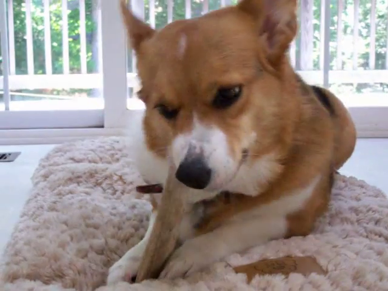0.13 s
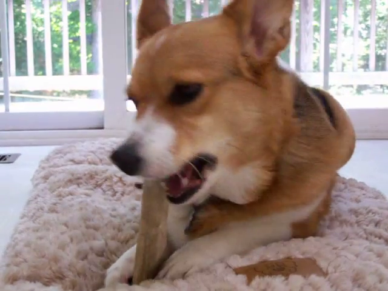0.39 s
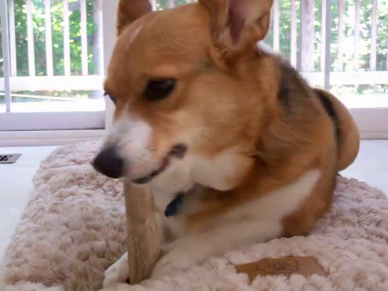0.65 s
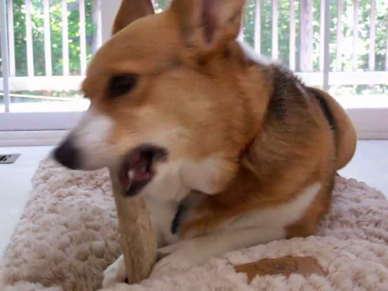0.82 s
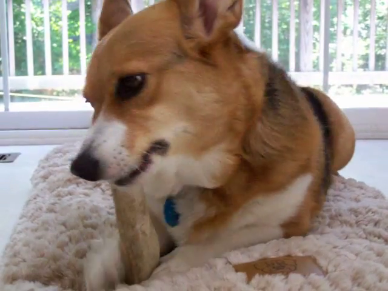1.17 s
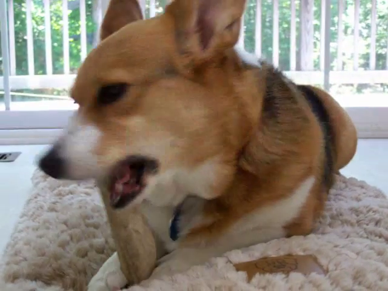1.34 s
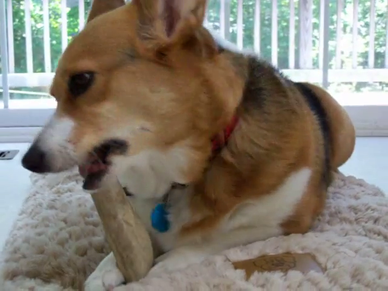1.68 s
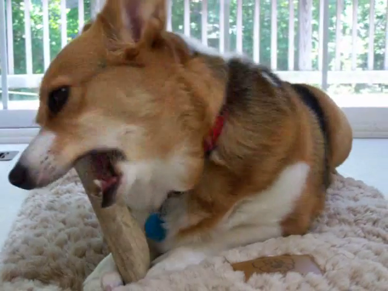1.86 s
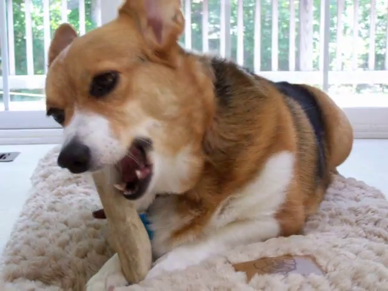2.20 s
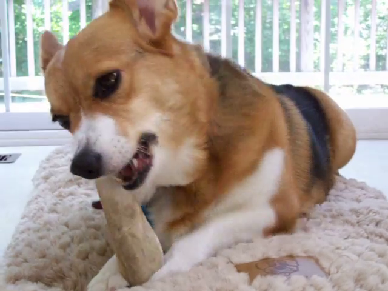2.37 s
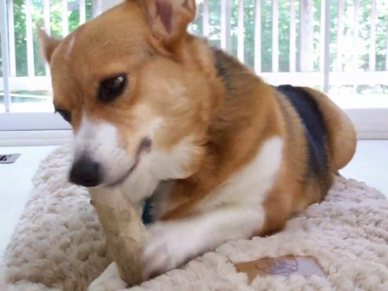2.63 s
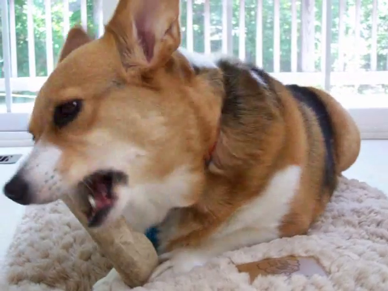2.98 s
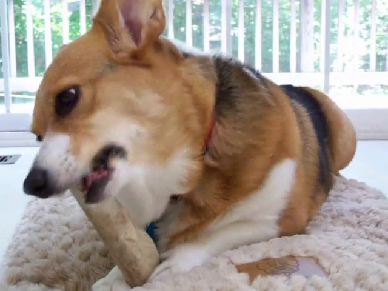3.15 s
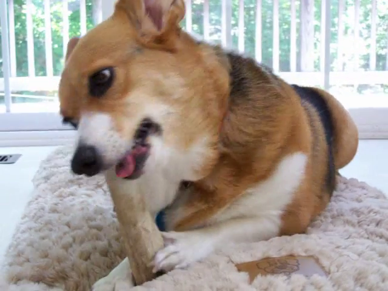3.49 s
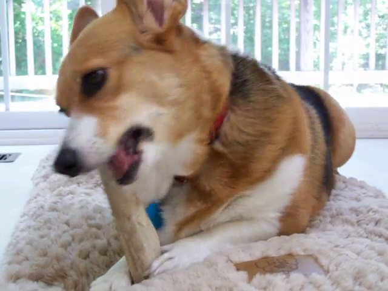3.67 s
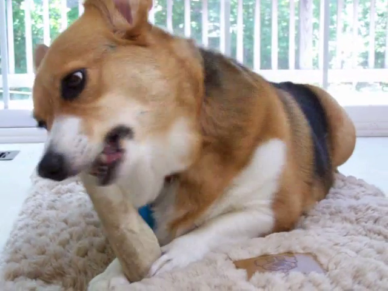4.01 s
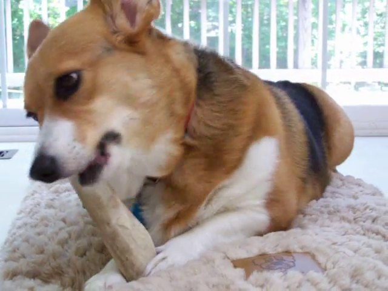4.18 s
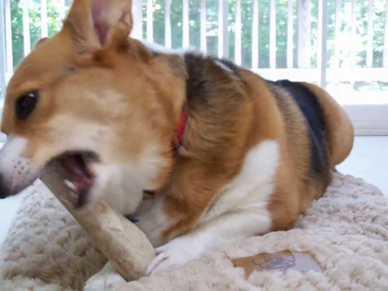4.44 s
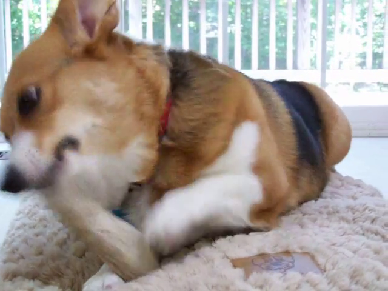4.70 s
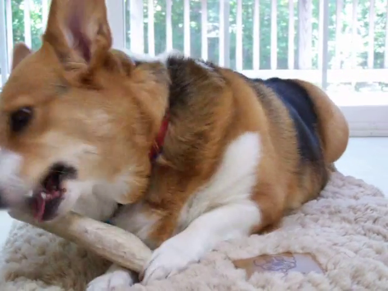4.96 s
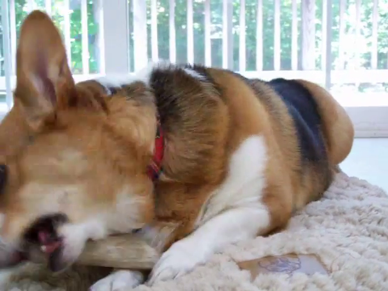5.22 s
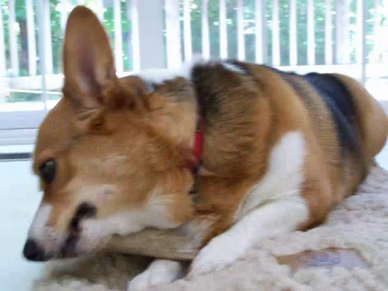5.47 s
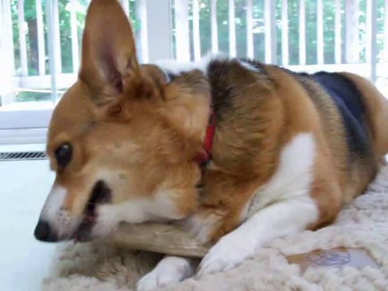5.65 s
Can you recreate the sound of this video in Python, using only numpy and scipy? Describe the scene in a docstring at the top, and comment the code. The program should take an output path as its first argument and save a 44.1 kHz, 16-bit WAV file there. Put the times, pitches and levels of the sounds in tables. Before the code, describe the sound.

A dog gnaws an antler close to the microphone in a small room. Its back teeth grind in short, uneven bites, each a dull thud with a gritty crunch. Between bites, teeth knock on the antler, sometimes with a brief ring, and the wet mouth ticks and smacks. The grinding stops near the end, leaving a knock and small mouth sounds. A low hum, ventilation noise and thin whine continue throughout.

```python
"""A dog gnaws an antler on a cushion in a small room, its mouth close to the microphone.
Its back teeth grind over the antler in short slips that thud in the jaw and break off fine grit.
Between bites teeth knock on the antler and set it ringing; the wet mouth ticks, squelches and smacks.
Behind the dog lies the room tone: a low hum, ventilation noise, hiss and a thin steady whine."""
import sys
import numpy as np
from scipy import signal
from scipy.fft import rfft, irfft
from scipy.io import wavfile

SR = 44100
rng = np.random.default_rng(int(sys.argv[2]) if len(sys.argv) > 2 else 0)


def transcribe(u):
    """Save the signal u as a 16-bit wav file named by the first command-line argument.

    u: samples, shape (n,) or (channels, n), limited to [-1, 1]; the rate is SR.
    q: integer samples, one column per channel.
    """
    v = np.clip(np.atleast_2d(u).T, -1, 1)
    q = np.round(v * 32767).astype(np.int16)
    wavfile.write(sys.argv[1], SR, q)


N = 257544

# spectra of the ventilation and hiss behind the dog: (frequency [Hz], relative level [dB])
VENTILATION_SPECTRUM = [(15, -54.5), (25, -28), (46, -11), (90, -9), (152, -3), (245, -5.5), (282, -6),
                        (359, -0.5), (389, -10.5), (515, -12), (629, -14), (1170, -19.5), (1350, -22),
                        (3000, -26.5), (3900, -48), (6600, -120)]
HISS_SPECTRUM = [(2400, -23.5), (3000, -9.5), (3450, -4.5), (3950, -5), (4300, 4.5), (4600, -12),
                 (5200, -10), (6400, -11), (7300, -21.5), (8600, -40.5)]
# lines of hum and whine: (frequency [Hz], rms level [dB], width [Hz])
HUM_LINES = [(58.9, -53, .5), (89, -62.5, 10), (123.6, -50.5, 6.4), (156.9, -49.5, 4.8), (242.7, -54, 11),
             (361.4, -56, 8.1), (3160, -62, 3.1), (3460, -65.5, 17), (4180, -55.5, 22), (4235, -52, 0.88),
             (4216, -59.5, 22), (4363, -52.5, 50)]
# bites, each an even run of slips that swell and ease off: (first slip [s], hardest moment [s],
# last slip [s], slips [count], swell [dB], thud level [dB], grit level [dB], jaw pitch [ratio])
BITES = [(.034, .153, .156, 4, 3.5, -27, -36, 1), (.47, .47, .47, 1, -2, -28, -53, 1.03),
         (.561, .578, .618, 4, 1.5, -29.5, -38, 0.98), (1.046, 1.071, 1.099, 3, 0, -21, -33.5, 1.01),
         (1.152, 1.153, 1.214, 2, 2, -29, -41, 1.06), (1.487, 1.514, 1.565, 4, 10, -21.5, -33, 1.03),
         (2.357, 2.43, 2.452, 3, 10.5, -22, -33, 1.03), (2.49, 2.513, 2.513, 2, 15, -17, -32.5, 1.06),
         (2.562, 2.60, 2.642, 3, 12, -21.5, -39, 0.974), (3.984, 4.004, 4.004, 2, 6.5, -18, -30, 1.1),
         (4.048, 4.05, 4.18, 4, 13.5, -21, -34.5, .92), (4.543, 4.545, 4.577, 2, 5, -24.5, -32, 1.02),
         (4.614, 4.615, 4.705, 3, 5.5, -26, -34, 0.83)]
# spectra of the jaw's thud and of crumbling antler: (frequency [Hz], relative level [dB])
JAW_SPECTRUM = [(40, -66), (90, -10.5), (130, -7), (200, 1), (270, -3), (350, 0), (420, -11.5),
                (520, -24.5), (700, -28.5), (1300, -29.5), (3000, -77.5)]
GRIT_SPECTRUM = [(60, -35), (300, -30.5), (700, 1), (1200, -11.5), (2000, 1.5), (3000, 7.5), (4400, 8),
                 (5400, -5.5), (7200, -6), (8600, -27.5)]
# squelches of lips and tongue: (middle time [s], length [s], level [dB])
SQUELCHES = [(.089, 0.038, -44), (.648, .043, -30), (2.455, 0.024, -36), (2.674, .089, -42.5),
             (3.238, 0.048, -45.5), (3.325, .024, -34.5), (3.592, 0.044, -37.5), (5.311, 0.027, -42.5)]
# a tooth knocks on the antler:
# (time [s], level [dB], contact pitch [Hz], muffling by the lips [0-1], crack relative to level [dB])
KNOCKS = [(0.115, -22.5, 2520, 0.6, 5.5), (.4744, -18, 2400, .85, -16), (.5523, -18.5, 2500, 0.73, -4),
          (0.7718, -29.5, 1900, 1, -14), (1.837, -19, 1850, 0.05, -12), (2.1538, -19, 1840, 0.34, 2),
          (2.3742, -27, 2200, 0.7, -3), (2.3975, -21.5, 2260, 0.6, 7), (2.4445, -25, 2560, .55, 3),
          (2.513, -14, 1430, 1, -11), (2.7527, -27.5, 1800, 0.9, 3), (2.947, -11.5, 3000, 0.8, -9),
          (2.9483, -9.5, 1630, 0.04, -9), (3.1297, -21, 2450, 0.8, -17), (3.7867, -14.5, 1820, 0.16, 3),
          (4.1984, -22.5, 2140, 1, -12), (4.5097, -19.5, 2210, 0.97, 0.5), (4.527, -20.5, 1880, 0.7, -1),
          (4.6085, -32, 2320, 0.7, 13), (5.1235, -16, 3780, 0.91, 6.5)]
# modes of the antler, whose uneven cross-section splits the main bending mode into a beating pair:
# (frequency [Hz], level [dB], t60 [s])
ANTLER_MODES = [(720, -27, .09), (1020, -27, .07), (1400, -28, .05), (1637, -22, .22), (1780, -18, .3),
                (1824, -21, .2), (2750, -20, .02), (3080, -22, .04), (4330, -21, .07)]
# spectra of a tooth's crack, the mouth's hollow and a saliva snap: (frequency [Hz], relative level [dB])
CRACK_SPECTRUM = [(80, -37), (500, -18), (1200, -12.5), (3000, -7), (4400, 6.5), (5600, -12), (7000, -3),
                  (8600, -33.5)]
HOLLOW_SPECTRUM = [(80, -31.5), (300, -14), (600, -2.5), (900, -7), (1400, -11), (2500, -13.5), (6000, -40)]
SNAP_SPECTRUM = [(300, -33), (1300, -14), (2100, -7.5), (3300, -2), (4100, 4), (4900, -2.5), (5700, -24.5),
                 (7000, -25.5), (8600, -32.5)]
# films of saliva pop: (time [s], level [dB], pitch [Hz], decay [cycles])
SMACKS = [(.571, -22, 3640, 1.8), (0.5965, -29.5, 6560, 3.6), (0.9542, -14, 4110, 2.2),
          (1.5155, -17.5, 4170, 1.3), (1.985, -32, 5500, 2.2), (2.208, -30, 2820, 0.83),
          (2.251, -31.5, 3100, 2.3), (2.564, -30.5, 6340, 1.5), (2.589, -29, 4230, 3.1),
          (2.8132, -31, 3380, 1.4), (3.327, -23.5, 3860, 3.6), (3.4188, -16.5, 4060, 2.7),
          (3.6595, -24.5, 4600, 3.4), (4.045, -24, 4200, .9), (4.7048, -21.5, 3660, 2.2),
          (4.798, -18, 4280, 4), (4.7982, -28, 6900, 1.8), (5.046, -32, 3000, 1.4),
          (5.6422, -34.5, 2950, 2.5)]
# decay of the small room: (frequency [Hz], t60 [s])
ROOM_T60 = [(150, 0.09), (350, 0.56), (800, 0.36), (2000, 0.31), (4000, 0.25), (8000, 0.11)]
# echoes reaching the microphone off the floor, the dog's body and a glass door: (delay [ms], gain [ratio])
ECHOES = [(3.4, 0.15), (5.3, -0.13), (9.6, 0.12), (11.7, -0.14), (14.9, 0.11), (18.3, -0.051)]


def amp(db):
    """Decibels to gain."""
    return 10 ** (np.asarray(db) / 20)


def unit(x):
    """Scales to an rms of one."""
    return x / np.sqrt(np.mean(x ** 2) + 1e-20)


def read(points, hz):
    """Reads a table along a logarithmic frequency axis."""
    f, value = np.transpose(points)
    return np.interp(np.log(hz + 1), np.log(f + 1), value)


def add(mix, s, sound):
    """Mixes a sound in from time s."""
    part = mix[max(round(s * SR), 0):][:len(sound)]
    part += sound[:len(part)]


def click(spectrum, size=1024):
    """The sharpest click that has this spectrum, with an energy of one."""
    log_gain = np.log(amp(read(spectrum, abs(np.fft.fftfreq(size, 1 / SR)))))
    minimum_phase = np.exp(np.conj(signal.hilbert(log_gain)))
    pulse = np.fft.ifft(minimum_phase).real[:size // 2]
    return pulse / np.linalg.norm(pulse)


def noise(gain):
    """Steady noise of rms one, shaped by a function of frequency."""
    return unit(irfft(rfft(rng.standard_normal(N)) * gain(np.fft.rfftfreq(N, 1 / SR)), N))


def ping(hz, cycles, t):
    """A tone whose envelope swells to one after this many cycles and dies."""
    age = t * hz / cycles
    return age * np.exp(1 - age) * np.sin(2 * np.pi * hz * t)


def catches(length, per_s, spread_db):
    """Irregular small impulses under one short swell of pressure."""
    n = max(int(length * SR), 64)
    count = max(round(length * per_s), 1)
    # each catch comes at a random moment of its own turn
    at = ((np.arange(count) + rng.random(count)) / count * n).astype(int)
    strengths = amp(spread_db * np.clip(rng.standard_normal(count), -2, 2))
    return np.bincount(at, strengths, n) * np.sin(np.pi * (np.arange(n) + .5) / n)


def burst(x, db, length):
    """Gives a burst the energy of a swell of this level and length."""
    return amp(db) * x * np.sqrt(length * SR / 2 / (np.sum(x ** 2) + 1e-20))


def room_tone(ventilation_db=-42, hiss_db=-48.5):
    """Behind the dog: ventilation noise, treble hiss, and wavering lines of hum and whine."""
    ventilation = noise(lambda f: amp(read(VENTILATION_SPECTRUM, f)))
    hiss = noise(lambda f: amp(read(HISS_SPECTRUM, f)))
    tones = 0
    for hz, db, width in HUM_LINES:
        line = signal.hilbert(noise(lambda f: 1 / (1 + (2 * (f - hz) / width) ** 2)))
        steadied = line.real / np.sqrt(abs(line) + 1e-9)
        tones = tones + amp(db) * unit(steadied)
    return amp(ventilation_db) * ventilation + amp(hiss_db) * hiss + tones


def slips(slip_s=.015, drag_s=.048, drag_thud_db=-8.5, drag_grit_db=-7.5):
    """Each bite moves the teeth in short slips, with longer, softer dragging round each one."""
    for first, hardest, last, count, swell_db, thud_db, grit_db, jaw_pitch in BITES:
        rise_s = max(hardest - first, slip_s)
        fall_s = max(rise_s, last - hardest)
        for s in np.linspace(first, last, count):
            eased_db = swell_db * abs(s - hardest) / (rise_s if s < hardest else fall_s)
            thud, grit = thud_db - eased_db, grit_db - eased_db
            yield s, slip_s, thud, grit, jaw_pitch
            yield s, drag_s, thud + drag_thud_db, grit + drag_grit_db, jaw_pitch


def grinding(jolts_per_s=240, grains_per_s=520, thud_lead_s=0.003025, chip_hz=2900, chip_db=-21):
    """Stick and slip: coarse jolts shake the jaw while fine grains break from the antler."""
    out, grain = np.zeros(N), click(GRIT_SPECTRUM)
    t = np.arange(len(grain)) / SR
    for s, length, thud_db, grit_db, jaw_pitch in slips():
        jaw = click([(hz * jaw_pitch, db) for hz, db in JAW_SPECTRUM], size=4096)
        thud = signal.fftconvolve(catches(length, jolts_per_s, spread_db=2.9), jaw)
        # each point of contact colours its grains with a brief resonance of its own
        chip = amp(chip_db) * ping(chip_hz * 2 ** rng.uniform(-0.59, 0.56), cycles=1.4, t=t)
        grains = catches(length, grains_per_s, spread_db=4.5)
        grit = signal.fftconvolve(grains * rng.choice([-1, 1], len(grains)), grain + chip)
        add(out, s - length / 2 - thud_lead_s, burst(thud, thud_db, length))
        add(out, s - length / 2, burst(grit, grit_db, length))
    return out


def mouth_ticks(per_s=22, db=-38, spread_db=2.5):
    """Faint wet ticks, close to the microphone, go on as the jaw works."""
    strengths = amp(db + spread_db * np.minimum(rng.exponential(1, N), 3))
    ticks = strengths * (rng.random(N) < per_s / SR)
    return signal.oaconvolve(ticks, click(GRIT_SPECTRUM))[:N]


def squelches(centre_hz=4010, spread_octaves=0.43, pitches=14, bubbles_per_s=110, fizz_db=-5.5):
    """Swarms of tiny bubbles, scattered about one pitch, burst between lips and gums with a fine fizz."""
    out, t, grain = np.zeros(N), np.arange(SR // 50) / SR, click(GRIT_SPECTRUM)
    for s, length, db in SQUELCHES:
        froth = 0
        for offset in np.linspace(-1, 1, pitches):
            hz = centre_hz * 2 ** (spread_octaves * offset)
            bubble = ping(hz, cycles=2.32, t=t) * np.exp(-offset ** 2)
            froth = froth + signal.fftconvolve(catches(length, bubbles_per_s, spread_db=6.1), bubble)
        fizz = signal.fftconvolve(catches(length, bubbles_per_s * pitches, spread_db=4.6), grain)
        add(out, s - length / 2, burst(froth, db, length))
        add(out, s - length / 2, burst(fizz, db + fizz_db, length))
    return out


def knocks(contact_cycles=0.56):
    """A tooth strikes with a pulse and a crack; lips damp the antler's ring and close a hollow round it."""
    out, t = np.zeros(N), np.arange(SR // 2) / SR
    crack, hollow = click(CRACK_SPECTRUM), click(HOLLOW_SPECTRUM)
    hollow = hollow / abs(hollow).max() / 2
    ring = sum(amp(db - 60 * t / t60) * np.sin(2 * np.pi * hz * t) for hz, db, t60 in ANTLER_MODES)
    for s, db, hz, muffling, crack_db in KNOCKS:
        ring_db = np.interp(muffling, [0, 1], [-3, -25.5])
        hollow_db = np.interp(muffling, [0, 1], [-13, 4])
        add(out, s, amp(db) * (ping(hz, contact_cycles, t) + amp(ring_db) * ring))
        add(out, s, amp(db) * (amp(hollow_db) * hollow - amp(crack_db) * crack))
    return out


def smacks(snap_db=4):
    """A saliva film snaps and rings the small pocket of air behind it."""
    out, t, snap = np.zeros(N), np.arange(SR // 20) / SR, click(SNAP_SPECTRUM)
    for s, db, hz, cycles in SMACKS:
        add(out, s, amp(db) * ping(hz, cycles, t))
        add(out, s, amp(db + snap_db) * snap)
    return out


def room(x, tail_db, early_db, bass_db, early_t60=0.073, echoes_per_s=4000):
    """Echoes off near surfaces reach the microphone within milliseconds; a short diffuse tail follows."""
    n = SR // 2
    t = np.arange(n) / SR
    near = rng.standard_normal(n) * (rng.random(n) < echoes_per_s / SR) * (t > .002)
    near *= amp(-60 * t / early_t60)
    far = rng.standard_normal(n) * (rng.random(n) < echoes_per_s / SR) * (t > .008)
    hz, times, bands = signal.stft(far, SR, nperseg=256)
    decay = amp(-60 * times / read(ROOM_T60, hz)[:, None])
    tail = signal.istft(bands * decay, SR, nperseg=256)[1][:n]
    echoes = amp(early_db) * near / np.linalg.norm(near) + amp(tail_db) * tail / np.linalg.norm(tail)
    for delay_ms, gain in ECHOES:
        add(echoes, delay_ms / 1000, np.array([gain]))
    # a negative bass_db thins the bass of the echoes, so the jaw's thuds stay crisp
    bass_shelf = amp(read([(350, bass_db), (900, 0.0088)], np.fft.rfftfreq(n, 1 / SR)))
    echoes = irfft(rfft(echoes) * bass_shelf, n)
    return x + signal.fftconvolve(x, echoes)[:N]


def scene():
    """The antler radiates all round and wakes the room more than the mouth, which faces the microphone."""
    antler = room(knocks(), tail_db=-9, early_db=-10.5, bass_db=1)
    chewing = grinding() + squelches() + mouth_ticks() + smacks()
    mouth = room(chewing, tail_db=-14, early_db=-6.5, bass_db=-7)
    return (antler + mouth + room_tone())[None]


def record(dry, edge_hz=8900):
    """One camera microphone, close to the dog, passes nothing above its band limit."""
    lowpass = signal.firwin(401, edge_hz, window=("kaiser", 9), fs=SR)
    return signal.oaconvolve(dry, lowpass[None], "same")


dry = scene()
out = record(dry)
transcribe(out)
```